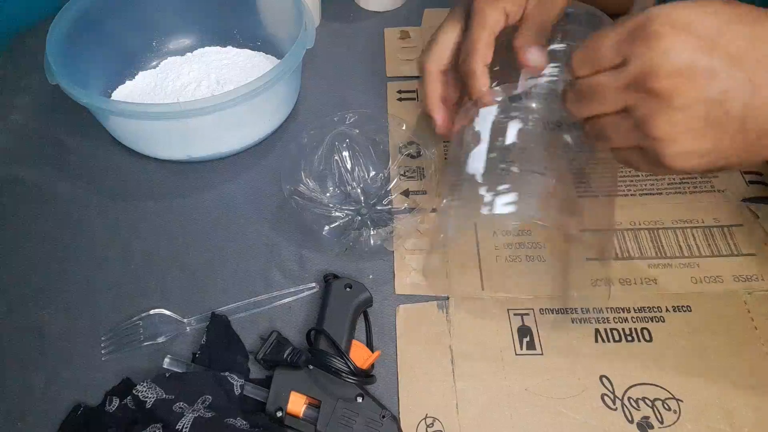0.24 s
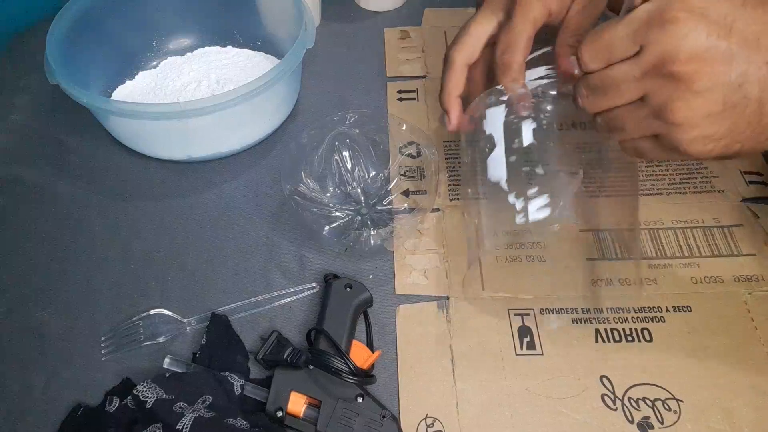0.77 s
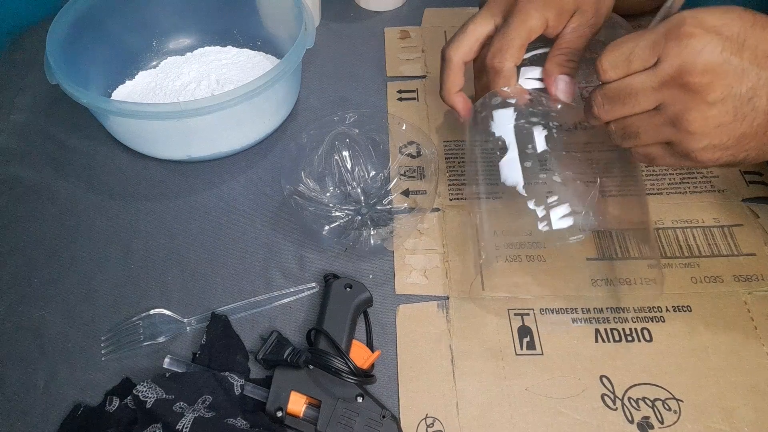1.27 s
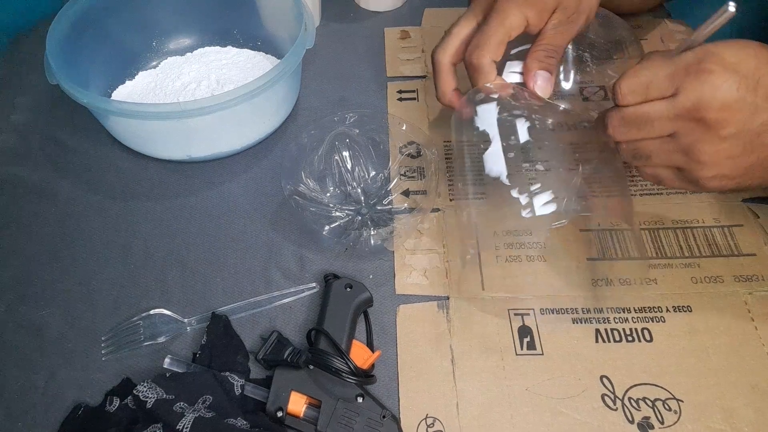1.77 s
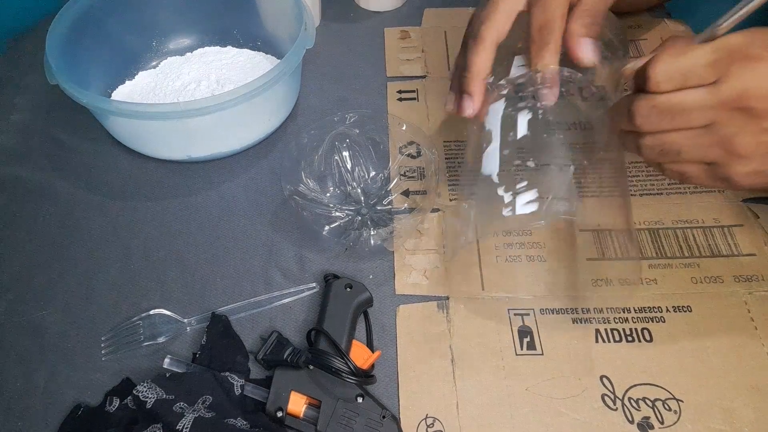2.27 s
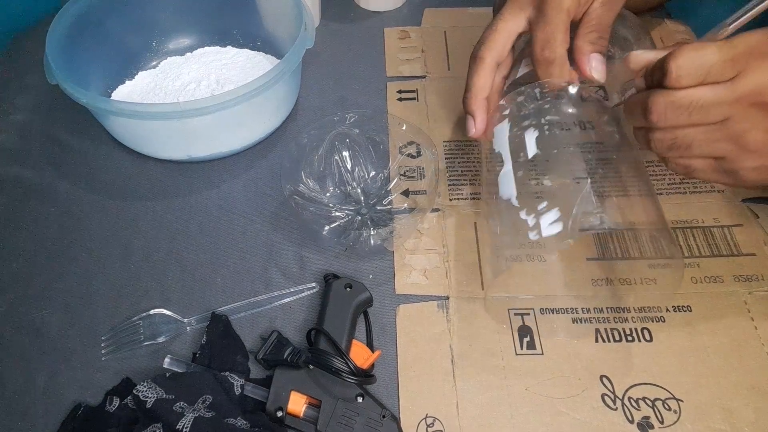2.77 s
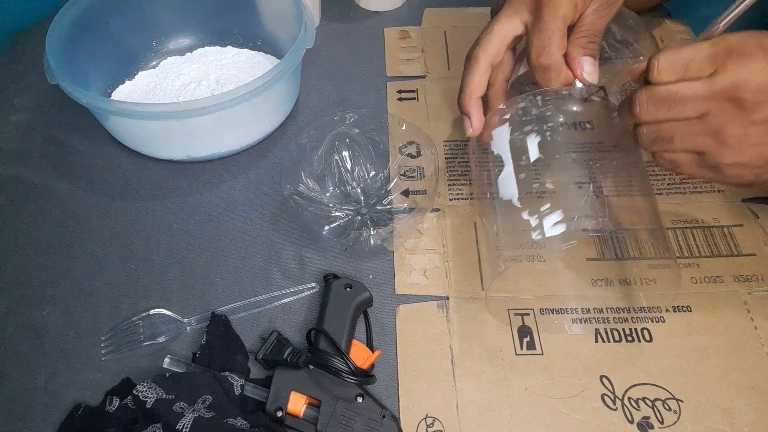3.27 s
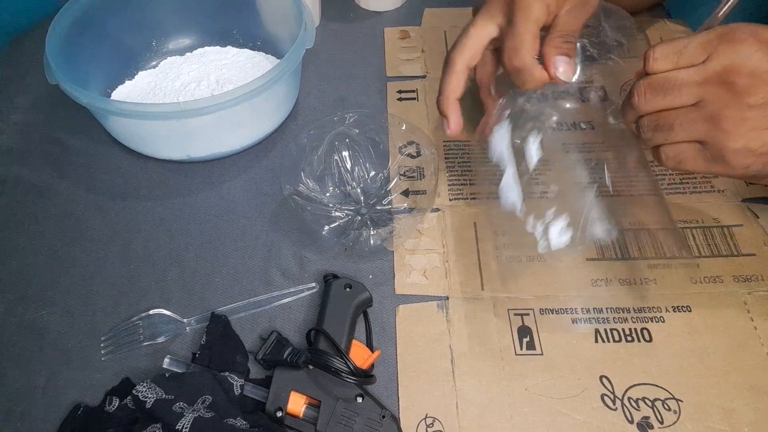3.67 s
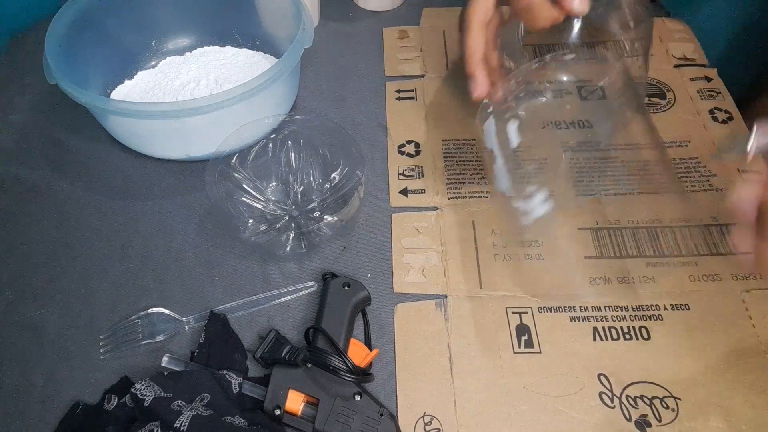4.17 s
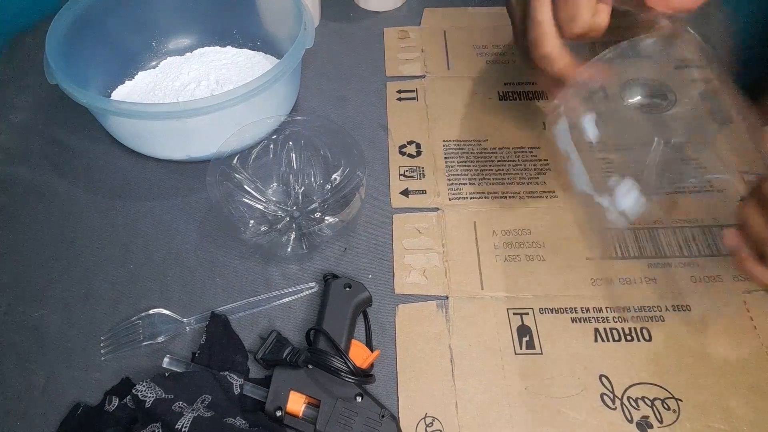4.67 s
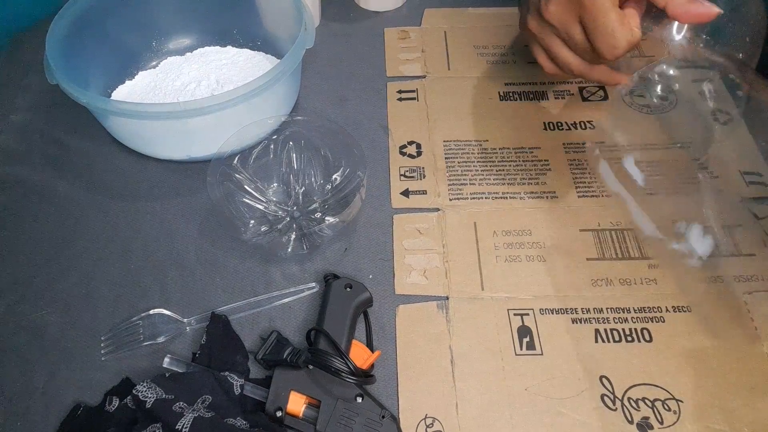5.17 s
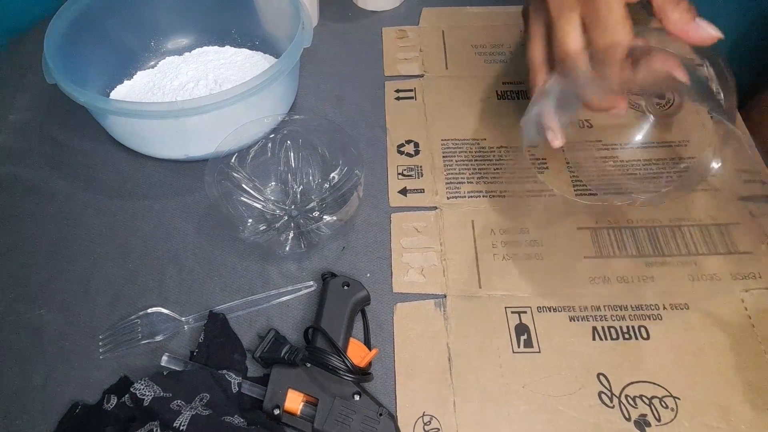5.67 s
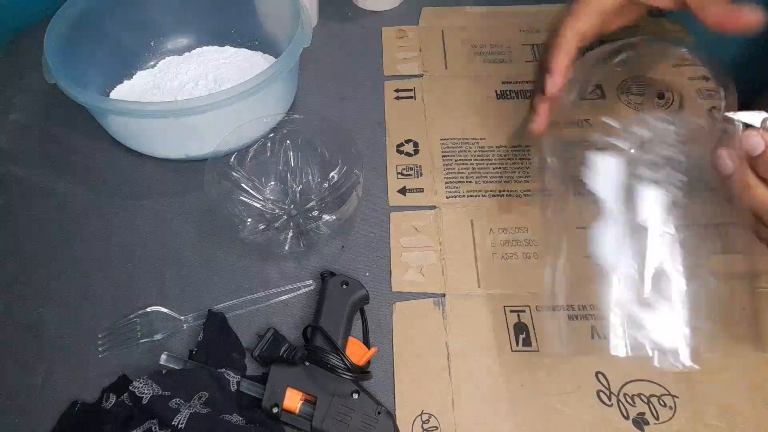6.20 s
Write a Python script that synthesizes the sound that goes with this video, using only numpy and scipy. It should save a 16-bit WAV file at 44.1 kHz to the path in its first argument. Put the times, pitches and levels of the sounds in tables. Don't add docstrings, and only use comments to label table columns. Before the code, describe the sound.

A thin plastic bottle crackles, pops and booms hollowly as hands squeeze and cut it close to the microphone in a small room.

```python
import sys
import numpy as np
from scipy import signal
from scipy.fft import rfft, irfft, next_fast_len
from scipy.io import wavfile
from scipy.ndimage import map_coordinates

SR = 44100
rng = np.random.default_rng(int(sys.argv[2]) if len(sys.argv) > 2 else 0)


def wav_out(sig):
    wavfile.write(sys.argv[1], SR, np.round(np.clip(np.atleast_2d(sig).T, -1, 1) * 32767).astype(np.int16))


def field_ratio(decibels):
    return 10 ** (np.asarray(decibels, dtype=float) / 20)


N = 284004

LOW_EDGE_HZ = 259


def unit(x):
    return x / np.sqrt(np.mean(x ** 2) + 1e-20)


def along(points, hz):
    f, v = np.transpose(points)
    return np.interp(np.log(hz + 1), np.log(f + 1), v)


def filtered(x, response):
    m = next_fast_len(x.shape[-1] + 8192)
    spectrum = rfft(x, m) * response(np.fft.rfftfreq(m, 1 / SR))
    return irfft(spectrum, m)[..., :x.shape[-1]]


def noise(spectrum):
    return unit(filtered(rng.standard_normal(N), lambda hz: field_ratio(along(spectrum, hz))))


def wobble(rate):
    knots = rng.standard_normal(int(N * rate / SR) + 4)
    return map_coordinates(knots, [np.arange(N) * rate / SR])


def curves(rows):
    s, *columns = np.transpose(rows)
    return [np.interp(np.arange(N) / SR, s, column) for column in columns]


def merged(*kinds):
    return np.array(sorted((*row, *shared) for rows, *shared in kinds for row in rows))


def strikes(times, sounds):
    out = np.zeros((sounds.shape[1], N + SR))
    for s, sound in zip(times, sounds):
        start = max(round(s * SR), 0)
        out[:, start:][:, :sound.shape[1]] += sound
    return out[:, :N]


def resonance(f, hz, width_hz):
    return 1j * f * width_hz / (hz * hz - f * f + 1j * f * width_hz)


# (frequency [Hz], width [Hz], level [dB])
HOLLOW = [(320, 71, -7), (408, 59, -3.5), (520.3, 34, -1), (647.3, 15, -5.5), (877, 51, -14.5)]


def hollow(x):
    def modes(f):
        return sum((-1) ** k * field_ratio(db) * resonance(f, hz, width) for k, (hz, width, db) in enumerate(HOLLOW))
    return filtered(x, modes)


# (frequency [Hz], correlation [0-1])
ALIKE = [(50, 0.27), (130, 0.42), (300, 0.61), (600, 0.71), (1200, 0.043), (4000, 0.038), (12000, 0.2)]


def diffuse(pair):
    def mid_side_gains(hz):
        angle = np.arccos(np.clip(along(ALIKE, hz), -1, 1)) / 2
        return np.array([np.cos(angle), np.sin(angle)])
    mid, side = filtered(pair, mid_side_gains)
    return np.array([mid + side, mid - side])


# (frequency [Hz], level [dB per Hz])
AIR = [(12, -28), (20, -23), (258, -9), (305, -3.5), (816, -33), (1280, -12.5), (2580, -18.5),
       (2970, -33.5), (4160, -40), (8170, -47.5), (15200, -33), (16500, -61)]


def room_tone():
    air_db = -58
    return field_ratio(air_db - 5.5) * unit(diffuse(np.array([noise(AIR), noise(AIR)])))


# (frequency [Hz], level [dB rms])
HUM = [(62, -81.5), (124, -79.5)]


def fridge():
    t = np.arange(N) / SR
    return sum(field_ratio(db + 0.5 + 2.1 * wobble(2.5)) * np.sin(2 * np.pi * hz * t) for hz, db in HUM)


# (time [s], rustle [dB], hum in the hollow [dB])
HANDS = [(0.0, -52.5, -45.5), (.39, -56, -64), (.53, -42, -34), (.66, -57, -78), (.85, -55, -58.5),
         (1.3, -60, -66.5), (1.7, -54.5, -72), (1.9, -63, -68), (2.19, -47.5, -47.5), (2.62, -60.5, -59.5),
         (3.6, -58.5, -73), (3.86, -44.5, -40.5), (4.3, -66.5, -72), (4.73, -67, -54), (4.95, -67.5, -71),
         (5.5, -54, -59.5), (5.8, -61, -59.5), (6.44, -52, -54)]
# (frequency [Hz], level [dB per Hz])
RUSTLE = [(410, -9), (700, -1.5), (1470, -7.5), (2100, -10), (5810, -16.5), (7770, -25.5), (15200, -26),
          (16500, -53)]


def hands():
    rustle_db, hollow_db = curves(HANDS)
    clumps = field_ratio(1.5 * wobble(30) + 2.5 * wobble(300))
    rustle = field_ratio(rustle_db - 3.0) * unit(clumps * noise(RUSTLE))
    hum = field_ratio(hollow_db + 1.5) * unit(hollow(clumps * rng.standard_normal(N)))
    return rustle + hum


# (time [s], peak [dB], length [s], hollow [dB], strip [dB])
CUTS = [(0.0, -24.5, 0.0032, 7, -4), (.33, -33.5, 0.043, 1, -12), (1.138, -53.5, 0.044, 2, -18),
        (1.234, -55.5, 0.076, 8, -5), (1.387, -55.5, 0.013, 18.5, 7.5), (1.514, -40.5, 0.066, 0.5, -1.5),
        (2.079, -46, 0.069, -1, -5), (3.0505, -35.5, 0.029, 7.5, -20.5), (3.143, -31.5, 0.032, -9, -15.5),
        (3.255, -58, 0.025, 12, 2), (3.342, -50.5, 0.02, 7.5, 0), (3.4216, -39.5, 0.019, 6.5, -4),
        (3.5, -42, 0.027, 4, -5), (3.588, -37.5, 0.018, 4.5, -4), (3.674, -45, 0.051, 10, 3.5),
        (3.752, -35, 0.12, 2.5, 0.5), (3.783, -25.5, 0.015, -10, -9), (4.54, -46.5, 0.026, 18, -17),
        (5.1404, -40, 0.019, -0.5, -6), (5.3644, -39, 0.041, 11, 2.5), (5.932, -44, 0.068, 5.5, -10),
        (6.064, -37, 0.045, 3.5, -5), (6.11, -48, 0.029, 7, -9), (6.343, -43, 0.061, 10.5, -5)]
# (time [s], peak [dB], length [s], hollow [dB])
SCRAPES = [(3.972, -36, 0.047, 8.5), (.164, -27, 0.01, -3), (.418, -28, 0.038, 7.5), (.6314, -32, 0.029, 9),
           (.756, -39.5, 0.037, 5), (2.171, -40, 0.1, 3), (2.203, -44, 0.014, 17), (2.373, -38, 0.023, 6),
           (2.448, -43, 0.017, 9.5), (2.6556, -42.5, 0.027, 5.5), (2.776, -53.5, 0.078, 11.5),
           (3.18, -40, 0.031, 6), (4.3677, -52.5, 0.042, 14.5), (4.51, -50, 0.033, 1),
           (4.705, -36, 0.039, 8), (4.8374, -33, 0.017, 4.5), (5.438, -36.5, 0.056, 0),
           (5.608, -44, 0.058, 15), (5.785, -39, 0.017, 3), (5.906, -40.5, 0.022, -6)]
CUT_SIZZLE_DB, SCRAPE_SIZZLE_DB, SCRAPE_STRIP_DB = -10, -21, -25
# (time [s], level [dB], length [s])
SQUEAKS = [
    (2.788, -71.5, 0.23),
    (3.064, -56, 0.01),
    (3.154, -50, 0.03),
    (3.192, -58, 0.023),
    (5.644, -49, .004),
    (5.657, -56, .007),
    (3.352, -63, 0.013),
]
# (frequency [Hz], level [dB per Hz])
CRACK = [(880, -1.5), (1500, -3.5), (2160, -2), (3410, -3.5), (4200, -5.5), (5660, -5.5), (7400, -11),
         (8300, -30.5), (11000, -99), (18700, -120)]
# (frequency [Hz], level [dB per Hz])
SIZZLE = [(5500, -30), (7800, -1), (10000, -1), (14000, -4), (16300, -12)]


def blade():
    t = np.arange(N) / SR
    grit = field_ratio(np.minimum(2.5 * wobble(300) + 1.5 * wobble(90), 5))

    def strip_and_edge(f):
        return np.array([resonance(f, 5600, 800), resonance(f, 2633, 200) ** 2])
    strip, squeak = filtered(rng.standard_normal(N), strip_and_edge)
    drag = np.zeros(N)
    for s, db, length in SQUEAKS:
        drag += field_ratio(db) * np.clip(np.minimum(t - s, s + length - t) / 0.0055 + 1, 0, 1)

    layers = [grit * noise(CRACK), hollow(grit * rng.standard_normal(N)), grit * noise(SIZZLE), grit * strip]
    gains = np.zeros((4, N))
    strokes = merged((CUTS, CUT_SIZZLE_DB), (SCRAPES, SCRAPE_STRIP_DB, SCRAPE_SIZZLE_DB))
    for s, db, length, hollow_db, strip_db, sizzle_db in strokes:
        rise = np.clip((t - s) / 0.012, 0, 1) ** 0.96
        stop = np.clip((s + abs(length) - t) / 0.0039 + 1, 0, 1)
        layer_db = np.array([[0], [hollow_db], [sizzle_db], [strip_db]])
        gains += rise * stop * field_ratio(db - 7.5 + layer_db)
    friction = sum(gain * unit(layer) for gain, layer in zip(gains, layers))
    return drag * unit(grit * squeak) + friction


# (time [s], thud [dB])
JOLTS = [(.12, -57), (.47, -52.5), (.62, -52.5), (.9, -58.5), (1.62, -59.5), (1.831, -67.5), (2.13, -58),
         (2.35, -70), (3.28, -77), (3.81, -51.5), (3.991, -48), (4.56, -60), (4.7, -51.5), (4.86, -57.5),
         (5.17, -59), (5.45, -43.5), (5.63, -49.5), (5.73, -50.5), (5.97, -51.5), (6.12, -50.5),
         (6.26, -54), (6.42, -51)]
# (frequency [Hz], level [dB per Hz])
THUD = [(12, -52.5), (20, -42), (42, -20.5), (54, -3), (102, -4), (150, -6), (217, -14.5), (260, -7.5),
        (340, -47.5), (570, -120)]


def table():
    rise_db_per_s, fall_db_per_s, still_db = 207, 120.5, -72.5
    t = np.arange(N) / SR
    level = field_ratio(still_db)
    for s, db in JOLTS:
        level = level + field_ratio(db - np.where(t < s, rise_db_per_s * (s - t), fall_db_per_s * (t - s)))
    lumps = field_ratio(1.5 * wobble(13))
    shake = diffuse(np.array([noise(THUD), noise(THUD)]))
    return level * unit(lumps * (shake + 1.8 * shake.mean(axis=0)))


# (time [s], peak [dB], frequency [Hz])
PINGS = [(.072, -43, 3730), (.173, -32.5, 6000), (.510, -24, 6250), (.529, -23, 4700), (.627, -28, 3900),
         (.657, -31, 4800), (.667, -31, 1550), (1.790, -31, 5820), (1.791, -33, 2500), (2.176, -37, 5300),
         (2.188, -36, 4910), (2.512, -38, 5600), (2.578, -49, 4200), (2.668, -41, 5700), (2.697, -54, 5050),
         (3.065, -44, 5230), (3.167, -35, 4910), (3.185, -36, 5330), (3.436, -42, 1110), (3.600, -37, 5500),
         (3.796, -14, 2800), (3.831, -31, 5430), (3.846, -25, 5300), (3.942, -34, 1610), (3.997, -28, 5330),
         (4.117, -34, 3480), (4.179, -48.5, 6500), (4.368, -42, 3660), (4.386, -39, 5850),
         (4.412, -60, 3180), (4.548, -33, 2150), (4.573, -39, 4930), (4.594, -37, 6020),
         (4.681, -24.5, 7300), (4.697, -40, 4560), (4.698, -34, 1980), (4.736, -34.5, 3100),
         (4.765, -32, 4340), (4.765, -21.5, 6140), (4.766, -21, 2110), (4.853, -35, 5300),
         (4.854, -30.5, 3960), (5.155, -30.5, 6720), (5.373, -25, 6180), (5.374, -23.5, 4830),
         (5.441, -16.5, 3930), (5.442, -22, 2140), (5.467, -28, 5460), (5.496, -38, 2600),
         (5.677, -26, 2240), (6.085, -36, 4150), (6.087, -36, 3030), (6.106, -31, 6300), (6.358, -33, 4040),
         (6.407, -52, 7800)]
# (time [s], peak [dB], frequency [Hz])
KNOCKS = [(.012, -31, 447), (.099, -28.5, 1850), (.173, -30.5, 546), (.238, -36.5, 460), (.8738, -9.5, 720),
          (.8738, -12.5, 1730), (.8745, -14, 2350), (.8745, -5, 3410), (.8742, -11.5, 5100),
          (.884, -27.5, 2920), (.910, -26, 2490), (.930, -31, 2550), (.950, -30, 2730), (.889, -24.5, 1600),
          (.958, -25.5, 770), (1.571, -16.5, 910), (1.5715, -15, 1530), (1.572, -16.5, 1896),
          (1.571, -27.5, 2810), (2.0665, -24, 354), (2.0665, -23.5, 945), (2.0665, -31, 1590),
          (2.207, -31.5, 410), (2.238, -48, 510), (2.352, -36, 675), (2.512, -30, 950), (2.79, -39, 607),
          (3.7955, -11, 1860), (3.826, -23, 1300), (3.836, -31, 2100), (3.848, -41, 1690),
          (4.024, -19, 712), (4.368, -31, 495), (5.442, -27, 847), (5.452, -27, 1330), (5.469, -25, 785),
          (5.483, -31, 1500), (5.679, -17.5, 906), (5.690, -17, 870), (5.931, -33, 686)]
# (time [s], peak [dB], frequency [Hz])
REBOUNDS = [
    (2.094, -29.5, 487),
    (2.3, -41, 580),
    (2.335, -42, 610),
    (4.37, -44.5, 284),
    (4.55, -36, 266),
    (5.622, -43, 330),
    (5.712, -24.5, 557),
]
PING_S, KNOCK_S, REBOUND_S = 0.027, 0.024, 0.066
# (time [s], left port's lag [s])
LEFT_LAG = [(4.2, 0.000035), (4.6, 0.00017)]


def pings():
    events = merged((PINGS, PING_S), (KNOCKS, KNOCK_S), (REBOUNDS, REBOUND_S))
    s, db, hz, t60 = events.T[:, :, None, None]
    t = np.arange(SR // 10) / SR
    late = t - np.interp(s, *np.transpose(LEFT_LAG)) * np.array([[1], [0]])
    patch_t60 = t60 * (1000 / hz) ** 0.24
    swell = (1 - np.exp(-t / 0.0013)) * field_ratio(db + 1.5 - 60 * t / patch_t60) * (1 - t / t[-1])
    return strikes(s.ravel(), swell * np.sin(2 * np.pi * hz * late))


# (time [s], crack peak [dB], crack [Hz], knock over the crack [dB])
SHARP_SNAPS = [(.0725, -29.5, 2820, -42), (.331, -33.5, 4660, -25), (.5187, -19, 4080, -2),
               (.5264, -20, 4500, -2), (2.0667, -42, 1900, 21.5), (2.1892, -32.5, 1860, -1),
               (2.614, -45, 1870, 6.5), (3.045, -41.5, 2490, 7), (3.7889, -7.5, 5100, -5),
               (3.795, -18, 5260, -4), (3.874, -24, 2460, -32), (3.9045, -33, 3550, -20),
               (3.924, -25.5, 4140, -22), (3.9499, -27, 2580, -9), (3.983, -28, 5200, -10),
               (3.9962, -24, 4670, -2), (4.017, -36, 4000, -10), (4.1664, -32.5, 2485, -4),
               (4.574, -37.5, 3700, -2.5), (4.5934, -32.5, 4000, -29), (4.6823, -18.5, 3280, -11),
               (4.7356, -31.5, 2080, -10), (4.7658, -15.5, 4340, -36), (4.8505, -29, 2790, 5),
               (5.154, -29, 3260, -18.5), (5.3283, -44, 2720, -11), (5.3467, -34.5, 4740, -7),
               (5.357, -41, 4000, -8), (5.3757, -23, 2930, -0.5), (5.4507, -19.5, 2590, 2),
               (5.5423, -33.5, 5140, -24), (5.943, -29, 3480, 2), (5.9705, -33, 2980, -3),
               (5.987, -34, 3960, -7), (6.012, -41, 6000, -15), (6.0705, -34, 5960, -6),
               (6.0855, -32, 4200, -10), (6.1828, -33.5, 1510, 2.5), (6.327, -38, 2100, -19),
               (6.359, -33, 1990, -26)]
# (time [s], crack peak [dB], crack [Hz], knock over the crack [dB])
PLAIN_SNAPS = [(.1666, -30.5, 4800, -17),  (.4712, -34, 1790, 13), (.5048, -22.5, 4680, 1),
               (.5338, -18.5, 1770, -17), (.626, -24, 3570, 8.5), (.6564, -34, 2140, -13),
               (1.6147, -29, 4120, 3.5), (1.6237, -31, 4160, 1), (1.7528, -40, 2780, -13),
               (1.775, -53, 2150, 2), (1.7898, -28, 5900, -5), (2.019, -34, 2100, 1),
               (2.2163, -27, 2650, 4), (2.5127, -34.5, 3300, 4.5), (3.6719, -32, 2560, 3.5),
               (3.7805, -21, 2590, -1.5), (3.9689, -21, 1810, -7), (4.0242, -34.5, 2570, 6),
               (4.118, -29, 2000, -29.5), (4.1793, -42, 2450, 14.5), (4.5472, -32.5, 3810, -2),
               (4.779, -29.5, 2610, 2), (5.4318, -34, 3000, 6), (5.4403, -15.5, 3730, -16),
               (5.471, -27, 1860, -2), (5.6894, -23.5, 2400, -19), (5.7693, -36, 4000, 4)]
# (time [s], crack peak [dB], crack [Hz], knock over the crack [dB])
DULL_SNAPS = [
    (.0987, -21.5, 1830, -17),
    (.421, -20, 1650, 8.5),
    (.8738, -0.5, 2780, -37),
    (1.5715, -17.5, 1600, 0.5),
    (4.1043, -33, 3970, -30),
    (4.1962, -28.5, 1980, -8),
    (4.386, -38.5, 2860, -42),
    (5.6608, -35, 2680, -10),
    (5.677, -17, 3530, 0.5),
    (6.19, -29, 1800, -19),
]
SHARP_SIZZLE_DB, PLAIN_SIZZLE_DB, DULL_SIZZLE_DB = -11, -16.5, -55.5
SHARP_S, PLAIN_S, DULL_S = 0.02, 0.018, 0.014
# (frequency [Hz], level [dB per Hz])
KNOCK = [(450, -17.5), (700, 12), (1200, -5), (1800, -8.5), (2500, -49.5)]


def snaps():
    pops = merged((SHARP_SNAPS, SHARP_SIZZLE_DB, SHARP_S), (PLAIN_SNAPS, PLAIN_SIZZLE_DB, PLAIN_S),
                  (DULL_SNAPS, DULL_SIZZLE_DB, DULL_S))
    s, db, hz, knock_db, sizzle_db, t60 = pops.T[:, :, None, None]
    t = np.arange(SR // 25) / SR
    f = np.fft.rfftfreq(len(t), 1 / SR)

    crack = field_ratio(along(CRACK, f)) * np.abs(.8 + 1.4 * resonance(f, hz, .25 * hz))
    crack = crack * field_ratio(0.12 * np.minimum(sizzle_db + 14.5, 0) * np.log2(1 + f / 2500))
    knock = field_ratio(knock_db + 2.0 + along(KNOCK, f))
    sizzle = field_ratio(sizzle_db - 3.5 + along(SIZZLE, f))
    colour = (crack + knock + sizzle) * (f * f / (f * f + 420 ** 2)) ** 2

    common, own = np.split(rng.standard_normal((len(pops), 3, len(t))), [1], axis=1)
    envelope = (1 - np.exp(-t / (0.06 * t60))) * field_ratio(-60 * t / t60)
    burst = envelope * (common + 2.0 * own)
    lag = np.interp(s, *np.transpose(LEFT_LAG)) * np.array([[.5], [-.5]])
    lead = SR // 1000 / SR
    direct = irfft(rfft(burst) * colour * np.exp(-2j * np.pi * f * (lag + lead)), len(t))
    click = irfft(field_ratio(db + 23.0) * colour * np.exp(-2j * np.pi * f * lead), len(t))

    def energy(x):
        return np.linalg.norm(x, axis=2, keepdims=True)
    direct *= field_ratio(1.8) * energy(click) / energy(direct)
    starts = s.ravel() - lead
    return strikes(starts, direct), strikes(starts, click)[0]


TIGHT_BOOMS = [(.349, -22, 525, -17), (.424, -12.5, 411, -9), (.454, -16, 372, -18),
               (.628, -11, 462.6, -16), (.874, -15.5, 526.4, 1), (1.793, -19, 503, -10.5),
               (2.094, -36, 447, -31), (2.192, -23, 530, -18), (3.672, -25, 515, -27.5),
               (3.78, -12.5, 513, -23.5), (3.789, -20.5, 499, -17.5), (3.819, -22, 493, -1.5),
               (3.976, -20.5, 481, 3), (4.778, -22, 502, -20), (5.941, -28.5, 616, -17)]
LOOSE_BOOMS = [
    (.51, -31.5, 386, -10),
    (1.757, -31, 470, -9),
    (1.998, -35, 533, -18),
    (2.214, -28, 484, -17),
    (3.065, -41, 510, 7),
    (4.117, -29, 618, -18),
    (4.368, -34, 592, -12),
    (6.359, -29, 499, 0.5),
]
FREE_BOOMS = [
    (3.953, -29.5, 467, -3.5),
    (4.682, -27, 500, -24.5),
    (4.767, -26, 422.6, 3),
    (4.846, -35, 540, -7),
    (5.384, -28, 602, -13.5),
    (5.44, -11, 517, -13),
    (5.467, -13.5, 511, -19),
    (5.678, -20.5, 443, -25),
    (5.688, -18, 540, 2.5),
]
PINCHED_BOOMS = [
    (2.067, -10.5, 422, -1.5),
    (4.023, -20, 410, 3),
    (4.196, -23.5, 400, 7.5),
    (4.547, -22.5, 385, -9.5),
]
SLAMMED_BOOMS = [
    (1.5715, -15.5, 505, -6.5),
    (1.599, -27.5, 507, -20.5),
]
TIGHT_LOW_DB, LOOSE_LOW_DB, FREE_LOW_DB, PINCHED_LOW_DB = -20.5, -9, -4, -43
TIGHT_RING, LOOSE_RING, FREE_RING, PINCHED_RING, SLAMMED_RING = 0.65, 0.85, 0.81, 0.65, 0.86
# (pitch ratio [1], level [dB], t60 [s])
PARTNERS = [(1, 4, 0.083), (0.857, -3, 0.091), (0.86, -8, 0.025), (0.621, 11.5, 0.056), (1.406, 1.5, 0.044),
            (1.6, -6, 0.092)]


def booms():
    dents = merged((TIGHT_BOOMS, TIGHT_LOW_DB, TIGHT_RING), (LOOSE_BOOMS, LOOSE_LOW_DB, LOOSE_RING),
                   (FREE_BOOMS, FREE_LOW_DB, FREE_RING), (PINCHED_BOOMS, PINCHED_LOW_DB, PINCHED_RING),
                   (SLAMMED_BOOMS, TIGHT_LOW_DB, SLAMMED_RING))
    s, db, hz, upper_db, lower_db, ring = dents.T[:, :, None, None]
    t = np.arange(SR // 5) / SR
    ratio, level_db, t60 = np.transpose(PARTNERS)[:, :, None]
    luck = rng.standard_normal((len(dents), 2 * len(PARTNERS), 1))
    luck_db, luck_hz = np.split(luck, 2, axis=1)
    level_db = level_db + upper_db * (ratio > 4 / 3) + lower_db * (ratio < 3 / 4) + 1.5 * luck_db
    mode_hz = hz * ratio * (1 + 0.027 * luck_hz)
    modes = field_ratio(level_db - 60 * t / (t60 * ring)) * np.sin(2 * np.pi * mode_hz * t)
    rings = field_ratio(db - 5.5) * (1 - np.exp(-t / 0.002)) * modes.sum(axis=1, keepdims=True)

    def no_bass(f):
        return (f * f / (f * f - LOW_EDGE_HZ ** 2 - 1.3j * f * LOW_EDGE_HZ)) ** 2
    return filtered(strikes(s.ravel(), rings)[0], no_bass)


# (time [s], peak [dB], frequency [Hz], free [s])
CAUGHT = [(0.421, -11, 481, .003), (0.511, -10.5, 444, 0.0021), (0.52, -12, 450, .002),
          (0.5264, -8.5, 446, 0.0022), (.5328, -10.5, 486, 0.0065), (0.544, -19.5, 475, 0.0086),
          (.554, -18.5, 492, 0.02), (.878, -14.5, 523, .019), (1.568, -25, 520, 0.0033),
          (1.571, -6, 490.5, .007), (1.581, -12, 504, 0.0091), (1.600, -16, 477, .012),
          (1.617, -25.5, 494, .009), (2.023, -27, 448, .006), (3.7881, -5.5, 492.4, 0.022),
          (3.818, -14, 486, .016), (3.837, -28, 491, 0.0093), (5.444, -19, 506, 0.022),
          (5.468, -20.5, 490, 0.0062), (5.479, -23.5, 506, 0.018), (5.6783, -15, 455, 0.0028),
          (5.688, -16, 524, 0.0041), (5.698, -19, 492, .004), (6.183, -21, 1430, 0.00068)]


def caught():
    free_t60, swell_s, catch_s = .2, 0.0012, .003
    s, db, hz, free = np.transpose(CAUGHT)[:, :, None, None]
    t = np.arange(SR // 20) / SR
    quick = hz / 500
    swell = (1 - np.exp(-quick * t / swell_s)) * field_ratio(db - 60 * t / free_t60)
    grip = np.clip(quick * (free - t) / catch_s + 1, 0, 1)
    return strikes(s.ravel(), swell * grip * np.sin(2 * np.pi * hz * t))[0]


# (frequency [Hz], t60 [s])
ROOM = [(200, 0.41), (500, 0.23), (1400, 0.25), (4000, 0.21), (10000, 0.19)]


def room(x):
    piece = SR // 5
    out = np.zeros((2, N + 2 * SR))
    padded = np.pad(x, (piece, 2 * piece))
    fade = np.sin(np.pi * np.arange(2 * piece) / (2 * piece))
    for at in range(0, N + piece, piece):
        hz, t, z = signal.stft(rng.standard_normal((2, SR // 3)), SR, nperseg=256)
        decay = field_ratio(-60 * t / along(ROOM, hz)[:, None])
        tail = signal.istft(z * decay, SR, nperseg=256)[1]
        tail = tail / np.linalg.norm(tail[0])
        wet = signal.fftconvolve(fade * padded[None, at:at + 2 * piece], tail, axes=1)
        out[:, at + 130:][:, :wet.shape[1]] += wet
    return diffuse(out[:, piece:piece + N])


def scene():
    cracks, clicks = snaps()
    dents, patches, held = booms(), pings(), caught()
    rubbing = filtered(blade() + hands(), lambda f: (f * f / (f * f + LOW_EDGE_HZ ** 2)) ** 2)

    def port_lag(hz):
        return np.exp(np.outer([-1j, 1j], np.pi * hz * .00006))
    direct = cracks + patches + filtered(dents + held + rubbing, port_lag)
    to_room = field_ratio(-5.5) * dents + field_ratio(-1.0) * (rubbing + clicks) + field_ratio(-8.5) * patches[1] + field_ratio(-9) * held
    return direct + room(to_room) + table() + room_tone() + fridge()


def roll_off(x):
    return signal.sosfilt(signal.butter(12, 16800, fs=SR, output="sos"), x)


# (frequency [Hz], left minus right [dB])
SIDES = [(100, -4), (500, -1.1), (1200, -2), (4000, -1.5), (12000, -2.5)]
# (frequency [Hz], level [dB])
BAND = [(15, -27.5), (45, 0.5), (15700, -1), (16400, -22), (16900, -68)]


def record(dry):
    def ports(hz):
        return field_ratio(np.outer([.5, -.5], along(SIDES, hz)) + along(BAND, hz))
    mix = np.clip(filtered(dry, ports), -1, 1)
    return roll_off(mix)


dry = scene()
out = record(dry)
wav_out(out)
```